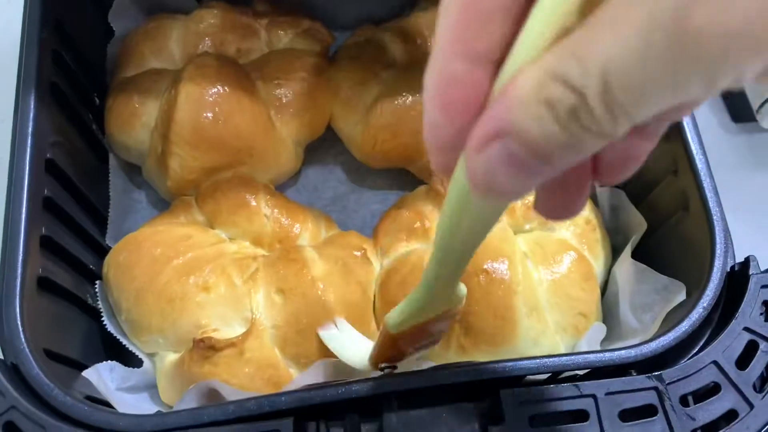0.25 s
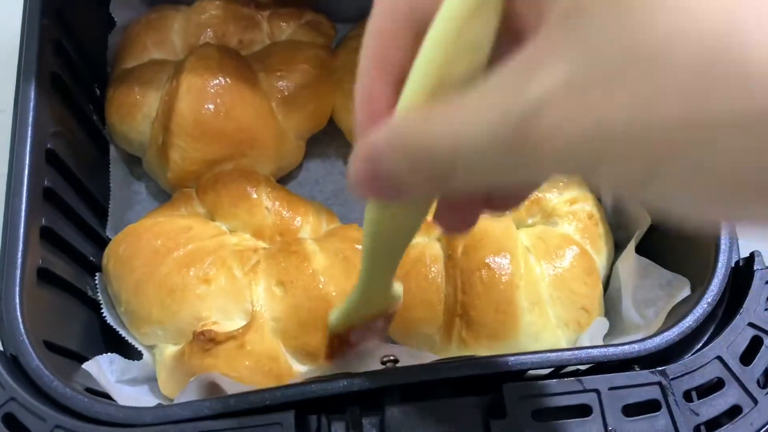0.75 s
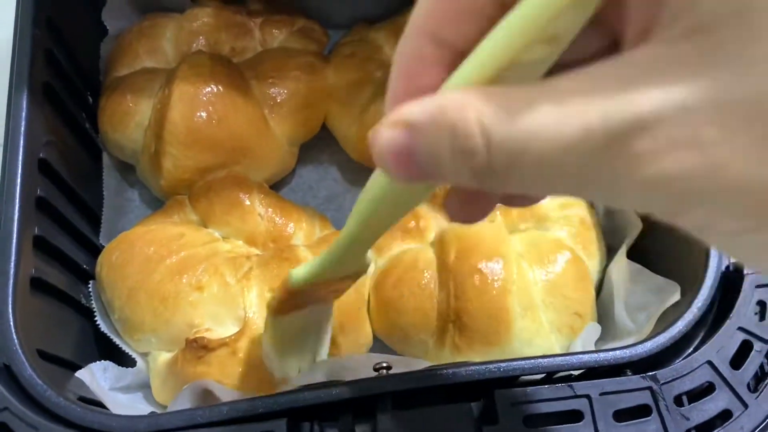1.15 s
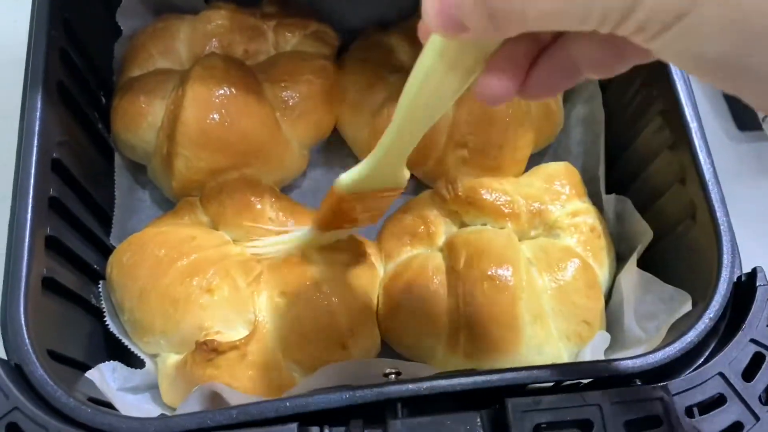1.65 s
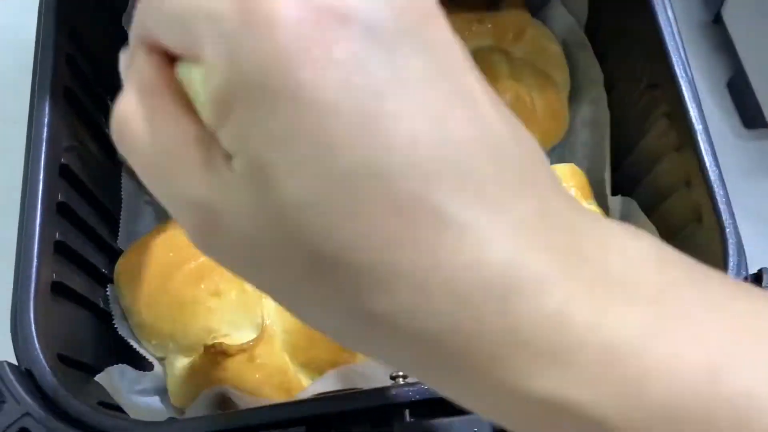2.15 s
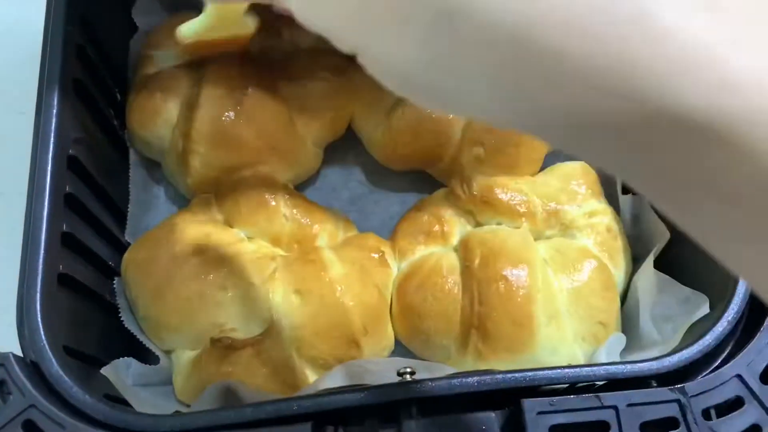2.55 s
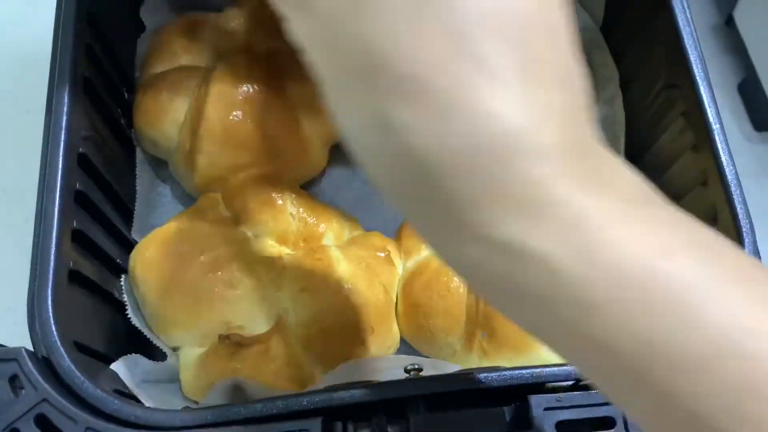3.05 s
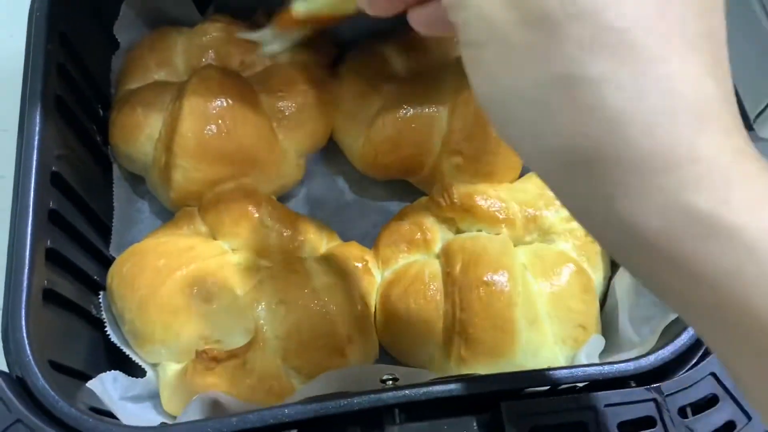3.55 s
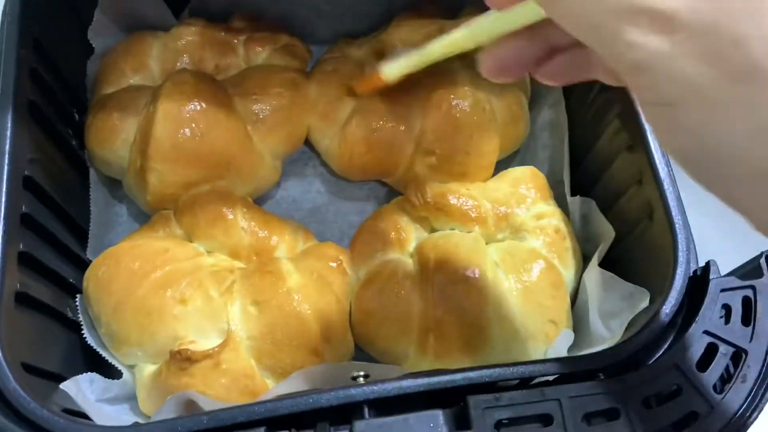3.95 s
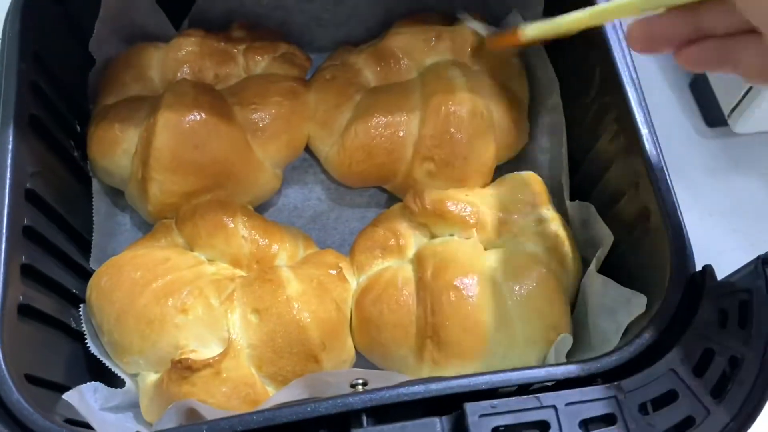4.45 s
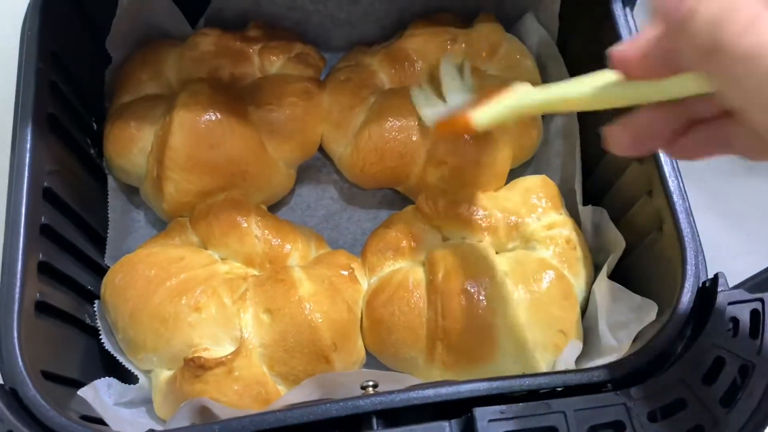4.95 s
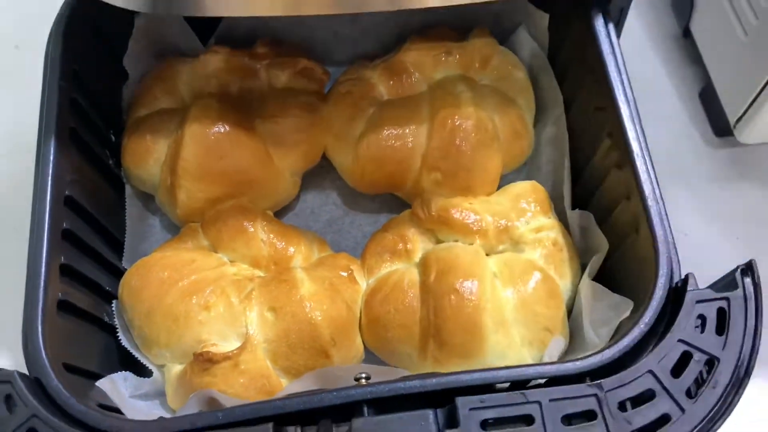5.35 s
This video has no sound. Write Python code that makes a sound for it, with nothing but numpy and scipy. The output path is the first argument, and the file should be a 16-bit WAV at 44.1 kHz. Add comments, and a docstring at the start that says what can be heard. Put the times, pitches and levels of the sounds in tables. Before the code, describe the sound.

A silicone brush swishes softly over bread rolls with tiny wet ticks, while parchment paper crackles beneath it, most busily in the first second or so. Dull thumps and rubs come from a hand on the close microphone. In the second half the brush handle knocks lightly on the air-fryer basket several times. An appliance hums steadily in a small kitchen.

```python
"""Glazing rolls in an air-fryer basket

A silicone brush swishes over bread rolls, its bristles sticking and letting go with tiny wet ticks.
Parchment buckles and crackles under it, and the handle knocks the basket and sets it ringing.
Close above, a hand slips on the phone that holds the two microphones: dull thumps, rubs and creaks.
Behind it all, a kitchen appliance hums in a small, lively room."""
import sys
import numpy as np
from scipy import signal
from scipy.fft import rfft, irfft
from scipy.io import wavfile

SR = 44100
rng = np.random.default_rng(int(sys.argv[2]) if len(sys.argv) > 2 else 0)


def materialize(psi):
    """Save the field psi as 16-bit PCM at rate SR to the path in sys.argv[1].

    A 1-D psi becomes a single channel; in a 2-D psi each row is a channel.
    """
    bounded = np.clip(np.atleast_2d(psi).T, -1, 1)
    quanta = np.round(bounded * 32767).astype(np.int16)
    wavfile.write(sys.argv[1], SR, quanta)


N = 246519

# brush strokes over crust and paper: middle_s, length_s, level_db
STROKE_SWELLS = [(0.245, 0.041, -63), (0.324, 0.027, -49), (0.467, 0.071, -68), (0.545, 0.13, -53),
                 (0.738, 0.091, -44), (0.873, 0.068, -43.5), (1.031, 0.1, -51), (1.161, 0.046, -43),
                 (1.467, 0.051, -63), (1.875, 0.16, -65), (2.021, 0.049, -54), (2.078, .05, -61),
                 (2.188, 0.12, -62.5), (2.35, 0.057, -60.5), (2.63, 0.16, -56), (2.908, 0.27, -55.5),
                 (2.993, 0.042, -44), (3.222, 0.029, -61), (3.49, 0.59, -65), (3.668, 0.02, -59),
                 (3.791, 0.049, -54.5), (3.912, 0.085, -60), (4.025, 0.089, -71), (4.23, 0.072, -56),
                 (4.683, 0.045, -60.5), (4.81, 0.038, -59), (4.874, 0.014, -52.5)]
# bright swish of the bristles: freq_hz, gain_db
BRISTLE_EQ = [(1200, -34), (2400, 6), (3500, 5), (5000, 5), (7500, 3.5), (11000, 0.5), (15000, 2)]
# the brush scraping the basket wall and rim: middle_s, length_s, level_db, rasp_hz, rasp_boost_db
BASKET_SCRAPES = [(1.148, 0.026, -44, 4930, 12), (1.294, 0.013, -40.5, 5100, 18),
                  (2.638, 0.047, -51, 2700, 5), (2.845, 0.027, -45, 3100, 10),
                  (2.896, 0.034, -43.5, 2940, 14), (2.999, 0.015, -38, 3140, 9),
                  (5.086, 0.016, -28, 8900, 9)]
# tone of a scrape under its rasp: freq_hz, gain_db
SCRAPE_EQ = [(300, -29), (900, -16), (1600, -5.5), (2400, 3.5), (5000, 7.5), (7000, -3), (9000, 3),
             (13000, -12), (15800, -22)]
# single threads of glaze parting: start_s, relative_level_db
GLAZE_THREADS = [(1.476, -51), (1.845, -45), (1.9, -40), (1.94, -54), (2.02, -50), (2.066, -43),
                 (2.09, -51), (2.17, -52), (2.361, -44), (2.766, -38), (3.228, -53), (3.545, -39),
                 (3.797, -53), (4.03, -51), (4.875, -51)]
# fader for the bed of sticky ticks: time_s, level_db
TACK_FADER = [(0, -78), (.25, -61), (1.35, -67), (1.7, -76), (2.05, -69), (2.5, -71), (3.2, -67.5),
              (3.6, -77), (3.9, -65.5), (4.3, -63), (4.9, -74), (5.25, -78)]
# parchment buckling: snap_s, relative_level_db, brightness, length_s, rustle_db, fold_hz, fold_boost_db
BUCKLES = [(0.198, -37.5, 7, 0.0017, -24, 3000, 11), (0.323, -38.5, 7, .0031, -19, 12000, 5),
           (0.3383, -27.5, 9, 0.0043, -25, 3000, 11.5), (0.343, -33, 8, 0.0027, -24, 7000, -6),
           (0.5243, -26, -5.5, 0.0035, -9, 4750, 6), (0.534, -34, 5.5, 0.018, -6, 1900, -8),
           (0.5606, -30, 12, 0.0048, -17, 13000, -4), (0.5864, -18.5, 15, .0009, -34, 14500, 1),
           (0.5948, -34, 7, .0014, -22, 12000, -1), (0.6024, -24.5, 6.5, 0.0015, -26, 13500, 5),
           (0.6052, -24, 9.5, 0.0014, -34, 12000, 0), (0.695, -23, 9.5, 0.008, -12, 2780, 9),
           (0.7038, -12, 11.5, 0.0015, -40, 2330, 8), (0.7064, -20.5, 15, 0.0022, -29, 12000, -4),
           (0.7315, -30, 7.5, 0.0045, -14, 2100, 1), (0.759, -29, 7.5, 0.0016, -21, 2400, 0),
           (0.851, -25, -5.5, 0.0023, -16, 1700, 0.5), (0.8529, -20.5, 6, 0.0037, -11, 7200, -2),
           (0.8568, -24.5, 9, 0.0026, -21, 1400, -3), (0.9189, -27.5, 10.5, .002, -17, 13500, 2),
           (0.9222, -32, 11, 0.004, -20, 2600, 6), (1.01, -30, 5.5, 0.0073, -7, 3670, 5),
           (1.053, -35, 8, 0.0011, -22, 7000, 1), (1.064, -39, 7, 0.0051, -20, 3600, 6),
           (1.202, -31, 7.5, .0016, -2, 4800, 3), (1.292, -36, -4, 0.0016, -11, 4800, 2),
           (1.2935, -31.5, 9, 0.0016, 0, 4800, 6), (1.332, -24, 12.5, 0.00084, -18, 4600, 10.5),
           (2.293, -47, 0, 0.0083, -22, 3500, 5), (2.624, -35.5, 0, .0017, -24, 2700, 13),
           (2.84, -38, 12, 0.0016, -18, 3000, 13), (2.8473, -24.5, 12, .001, -32, 3200, 11),
           (2.888, -37.5, 2, .0014, -22, 3000, 10), (2.8974, -27, 5, 0.00083, -30, 15000, 10),
           (2.923, -38, 0, .0008, -24, 15000, 6), (2.974, -33, 8, .0015, -22, 3000, 4),
           (2.979, -29, 4, .0014, -20, 2920, 12), (2.9855, -26, -2.5, 0.0012, -22, 2400, 8),
           (3.746, -39.5, 2, 0.0064, -24, 2870, 8), (4.292, -42.5, -7, 0.0075, -19, 3900, 6)]
# crisp tone of parchment: freq_hz, gain_db
PAPER_EQ = [(250, -9), (500, -3), (1050, -1.5), (1550, -7), (2400, 4), (2900, -2), (3700, -1), (5000, -1.5),
            (7000, -1), (9000, -4), (13000, -7), (15400, -6.5), (15900, -11)]
# hollow tone of the tray under the paper: freq_hz, gain_db
TRAY_EQ = [(150, -23), (330, 2.5), (500, 4.5), (750, -13), (1200, -10), (2000, -27)]
# handle hitting the basket: start_s, level_db, treble_db, body_db, crack_decay_s, relative_ring_db,
# right_lag_ms, spot_hz, spot_db, spot_t60_s, overtone_hz, overtone_db, rebound_db
HANDLE_KNOCKS = [(0.1624, -22.5, 8.5, -8, 0.0046, -27.5, 0.065, 734, -13, 0.14, 7400, -28.5, -28),
                 (3.507, -30, -5, -4, 0.0039, -11.5, 0.063, 1102, 5.5, 0.023, 2680, -6, -42),
                 (3.968, -28.5, -4.5, -2.5, 0.004, -16.5, .005, 1154, -6, 0.07, 1520, -9, -10.5),
                 (4.125, -35.5, -16, -0.5, 0.0055, -21, .005, 1570, -4, 0.029, 2070, -2.5, -23),
                 (4.2064, -33, -4, 2.5, 0.0043, -21, .02, 413, 7, 0.029, 1060, -7, -12),
                 (4.3896, -20, 13, -3, 0.0099, -6, 0.022, 450, -21, 0.045, 2898, -8, -7.5),
                 (4.4883, -43, -11, 8, 0.0086, -12, .02, 358, 11, 0.042, 880, 2, -3.5),
                 (5.0867, -22, 2, -6.5, 0.0086, -15.5, .02, 930, -6, 0.088, 2472, -8, -22)]
# dry crack of a knock: freq_hz, gain_db
CRACK_EQ = [(200, -24), (450, 19), (1000, 9), (1650, 8.5), (2300, 9.5), (3000, 2.5), (3900, 1.5), (4900, 4),
            (6100, -3), (7400, 3.5), (10000, -3.5), (15800, -6)]
# basket resonances: pitch_hz, damping, relative_level_db
BASKET_MODES = [(245, 30, 0.5), (447.4, 27, 12.5), (522, 54, 5.5), (634, 40, 2.5), (702, 40, 4),
                (888, 35, 8), (1345, 30, 8), (1505, 27, 6), (1800, 25, 5), (1918, 50, 7), (2230, 30, 9.5),
                (2293, 25, 10), (2530, 54, 1), (2767, 60, 4), (2844, 29, 10), (3330, 40, 9), (4780, 30, 1),
                (5240, 47, -4), (7040, 32, 13), (7800, 60, 5)]
# skin slipping on the phone's case: start_s, length_s, level_db, nominal_pitch_hz
SKIN_SLIPS = [(0.049, 0.0092, -33, 121), (0.126, 0.062, -33, 142), (0.251, 0.0096, -33.5, 130),
              (0.328, 0.013, -34, 170), (0.413, 0.013, -32, 122), (1.16, 0.027, -26, 130),
              (1.212, 0.056, -31.5, 163), (1.297, .04, -25.5, 135), (1.666, .01, -29.5, 131),
              (2.2684, 0.0063, -13.5, 242), (2.29, 0.008, -26, 199), (2.302, 0.014, -18, 125),
              (2.318, 0.0057, -18.5, 213), (2.334, .012, -37, 167), (2.342, 0.0091, -21.5, 224),
              (2.845, 0.0087, -29, 112), (3.163, 0.006, -32.5, 313), (3.306, 0.009, -33, 345),
              (3.4197, 0.013, -22, 144), (3.447, .012, -26, 202), (3.464, 0.011, -27.5, 150),
              (3.498, 0.0097, -21, 225), (3.522, 0.028, -24, 237), (5.084, 0.0071, -31, 235)]
# the palm shifting on the case: middle_s, length_s, level_db
PALM_RUBS = [(0.32, 0.51, -44), (1.255, 0.14, -43.5), (2.308, 0.063, -31), (3.48, 0.1, -44.5)]
# dull tone of sliding skin: freq_hz, gain_db
SCUFF_EQ = [(40, -31.5), (90, 3), (200, 3.5), (450, -7), (800, -24.5), (1200, -32.5), (4000, -75)]
# the case creaking under the fingers: start_s, level_db, pitch_hz, decay_s
CASE_CREAKS = [(2.2708, -25, 620, 0.0014), (2.2912, -33, 1050, 0.0017), (2.318, -25.5, 420, .003),
               (2.34, -36, 810, 0.0022), (2.3448, -35.5, 1100, 0.0022), (2.3855, -44, 1240, .002),
               (2.406, -46, 1090, 0.0042), (3.4166, -30, 510, 0.0026)]
# tone of a creak: pitch_multiple, gain_db
CREAK_EQ = [(.25, -3), (.7, 6.5), (1, 1), (1.5, -9), (2.5, -31), (5, -32), (12, -52)]
# slapback off the basket walls: delay_s, level_db
WALL_ECHOES = [(.00085, -20.5), (.0015, -14), (.0023, -22.5)]
# stereo balance of close sounds: freq_hz, left_minus_right_db
MIC_BALANCE = [(500, -1.5), (1100, 0), (2400, 2), (5000, 1.7), (10000, -0.3), (15000, -1.5)]
# rush of the appliance's fan: freq_hz, gain_db
FAN_EQ = [(26, -49), (45, -22), (90, 2.5), (180, -10.5), (240, 4.5), (290, -2), (390, -1.5), (520, -9),
          (900, -12), (1250, -14.5), (1550, -15), (1750, -16.5), (2100, -16.5), (3200, -33.5), (10000, -42),
          (15800, -58)]
# motor tones: pitch_hz, level_db, right_phase_lag_rad
MOTOR_TONES = [(95.7, -66, 0.42), (232.8, -50, 0.65), (396, -59.5, 0.1), (856, -57.5, 2.08),
               (1056, -58, 1.14)]
# the room's high hiss: freq_hz, gain_db
HISS_EQ = [(1200, -13), (2400, 7.5), (4000, 4.5), (7500, -2.5), (11000, -11.5), (15000, -16)]
# fader for that hiss: time_s, level_db
HISS_FADER = [(0, -60), (1.6, -62.5), (3.2, -61), (4.3, -58.5), (5.59, -58)]
# how alike the room sounds at the two microphones: freq_hz, correlation
ROOM_CORRELATION = [(50, 0.076), (110, 0.96), (250, 0.96), (430, 0.84), (650, 0.41), (1100, 1),
                    (1500, -0.83), (2200, 0.18), (2700, -0.047), (4000, -0.1), (12000, 0.063)]

TIME = np.arange(N) / SR


def bristles():
    """Soft tufts stick and let go: a fluttering hiss with sticky ticks, both riding the pressure."""
    pressure = swells(STROKE_SWELLS)
    flutter_db = 1.5 * drift(35) + 3.5 * drift(330)
    hiss = unit(colour(grains(N, spread_db=1.7, lag_samples=3.8), BRISTLE_EQ)) * undb(flutter_db)
    envelope = releases(per_s=120, spread_db=10.5, decay_s=0.00083)
    ticks = unit(colour(grains(N, spread_db=6.5, lag_samples=7.1) * envelope, PAPER_EQ, tilt_db=5))
    return pressure * (hiss + undb(-7) * ticks)


def scrapes():
    """The brush catches and slips on the basket wall: quick, uneven grit with a rasp where the wall rings."""
    catches_per_s, catch_decay_s, rasp_width_oct = 190, 0.0014, 0.24
    out, hz = np.zeros((2, N)), np.geomspace(300, 17000, 60)
    t = np.arange(SR // 8) / SR - 1 / 16
    for middle_s, length_s, db, rasp_hz, boost_db in BASKET_SCRAPES:
        tone_db = at(SCRAPE_EQ, hz) + boost_db * bell(hz, rasp_hz, rasp_width_oct)
        catches = np.cumsum(catches_per_s * undb(4 * drift(200, len(t)))) / SR
        grit = 0.25 + np.exp(-(catches % 1) / catches_per_s / catch_decay_s)
        grit *= undb(2 * drift(394, len(t)))
        eq = roughen(np.transpose([hz, tone_db]), spread_db=4)
        rasp = unit(colour(grains(len(t), spread_db=6, lag_samples=4.04) * grit, eq))
        add(out, middle_s + t[0], undb(db) * np.exp(-(2 * t / length_s) ** 2) * rasp)
    return out


def glaze():
    """Single threads of glaze part, each with a tiny, clear tick."""
    decay_s, trim_db = 0.0018, -19
    out, t = np.zeros((2, N)), np.arange(SR // 50) / SR
    for start_s, db in GLAZE_THREADS:
        tick = grains(len(t), spread_db=3.1, lag_samples=5.1) * np.exp(-t / decay_s)
        add(out, start_s, unit(colour(tick, BRISTLE_EQ)) * undb(db + trim_db))
    return out


def tack():
    """The wet bristles never quite leave the crust: countless fine threads part in a faint ticking bed."""
    envelope = releases(per_s=100, spread_db=4, decay_s=0.0006, limit_sigma=2)
    ticks = grains(N, spread_db=4.2, lag_samples=2.7) * envelope
    return unit(colour(ticks, BRISTLE_EQ, tilt_db=3)) * fader(TACK_FADER)


def releases(per_s, spread_db, decay_s, limit_sigma=np.inf):
    """Glaze lets go at random moments: an envelope of uneven spikes that die fast."""
    onsets = rng.random(N) < per_s / SR
    sizes = undb(spread_db * np.clip(rng.standard_normal(N), -limit_sigma, limit_sigma))
    return signal.lfilter([1], [1, -np.exp(-1 / (decay_s * SR))], onsets * sizes)


def parchment():
    """Each buckle creaks up under the brush, snaps, rings its fold and settles with a patchy rustle."""
    lead_s, attack_s, rustle_decay_s, trim_db = 0.015, 0.0002, 0.011, -18.5
    out, t = np.zeros((2, N)), np.arange(SR // 8) / SR - lead_s
    after = np.maximum(t, 0)
    for snap_s, db, brightness, length_s, rustle_db, fold_hz, boost_db in BUCKLES:
        snap = (1 - np.exp(-after / attack_s)) * np.exp(-after / (0.6 * length_s))
        creak = (t <= 0) * undb(-26) * np.exp(-np.abs(t) / 0.004)
        rustle = (t > 0) * undb(rustle_db) * np.exp(-after / rustle_decay_s)
        patches = undb(5.5 * drift(500, len(t)) - 2)
        envelope = snap / snap.max() + patches * (creak + rustle)
        eq = roughen(PAPER_EQ, spread_db=1.8)
        eq[:, 1] += boost_db * bell(eq[:, 0], fold_hz, width_oct=0.4)
        fibres = grains(len(t), spread_db=4, lag_samples=2.8, width=0.84)
        crackle = unit(colour(fibres * envelope, eq, tilt_db=1.63 * (brightness - 0.5)))
        add(out, snap_s - lead_s, crackle * undb(db + trim_db) * np.sqrt(length_s / 0.0029))
        add(out, snap_s, tray(db - brightness / 2, length_s))
    return pan(out, 0.12)


def tray(db, buckle_s):
    """A buckle shakes the tray under the paper, which answers short and hollow."""
    decay_s, trim_db = 0.014, -15.5
    t = np.arange(SR // 8) / SR
    body = unit(colour(diffuse(len(t)), TRAY_EQ)) * np.exp(-t / decay_s)
    return body * undb(db + trim_db) * np.sqrt(buckle_s / 0.0043)


def handle():
    """The handle hits the basket and falls back once on the rim, duller and with a longer chatter."""
    rebound_s = 0.022
    out = np.zeros((2, N))
    for start_s, db, treble_db, body_db, decay_s, ring_db, lag_ms, *spot, rebound_db in HANDLE_KNOCKS:
        add(out, start_s, knock(db, treble_db, body_db, decay_s, ring_db, lag_ms, *spot))
        rebound = knock(db + rebound_db, treble_db - 23.5, body_db,
                        decay_s=0.021, ring_db=-15, lag_ms=lag_ms,
                        spot_hz=925, spot_db=-19, spot_t60_s=0.033, overtone_hz=1448, overtone_db=-0.5)
        add(out, start_s + rebound_s, rebound)
    return out


def knock(db, treble_db, body_db, decay_s, ring_db, lag_ms,
          spot_hz, spot_db, spot_t60_s, overtone_hz, overtone_db):
    """One hit in three layers: a dry crack, a ping from the struck spot and the whole basket ringing."""
    t, lag_s = np.arange(SR // 5) / SR, lag_ms / 1000
    mic_t = t - np.array([[0], [lag_s]])
    eq = roughen(CRACK_EQ, spread_db=2.3)
    eq[:, 1] += body_db / (1 + (eq[:, 0] / 1900) ** 6)  # low shelf
    noise = grains(len(t), spread_db=3.6, lag_samples=lag_s * SR, width=1.8)
    crack = unit(colour(noise, eq, treble_db)) * np.exp(-t / decay_s)
    ping = undb(spot_db) * np.sin(2 * np.pi * spot_hz * mic_t)
    ping += undb(overtone_db) * np.sin(2 * np.pi * overtone_hz * mic_t)
    ping *= die_away(t, spot_t60_s)
    hz, damping, mode_db = np.transpose(BASKET_MODES)[:, :, None]
    weights = undb(mode_db) / np.linalg.norm(undb(mode_db))
    envelopes = weights * np.exp(-t * (42 + 0.4 * damping + 0.014 * hz))
    # high modes radiate differently towards each microphone
    turns = rng.random(hz.shape) + np.minimum(hz / 16000, 0.14) * rng.standard_normal((2, *hz.shape))
    ring = np.sum(envelopes * np.sin(2 * np.pi * (hz * mic_t[:, None] + turns)), axis=1)
    return undb(db) * (pan(crack, 0.34) + pan(ping + undb(ring_db + 6) * ring, 1.7))


def grip():
    """Slipping skin catches on the case: each catch is a scuffed thump that sinks as the skin relaxes."""
    gap_s, attack_s, glide_s = 0.0225, 0.00076, 0.0032
    out, t = np.zeros((2, N)), np.arange(SR // 10) / SR
    for start_s, length_s, db, slip_hz in SKIN_SLIPS:
        for k, (late, soft, detune, side) in enumerate(rng.standard_normal((4, 4))):
            delay_s = gap_s * (k + 0.074 * late * (k > 0))
            hz = slip_hz * 2 ** (0.15 * detune)
            pitch_hz = hz * (0.88 + 0.96 * np.exp(-t / glide_s))
            # the case flexes, so the two microphones swing a little out of step
            skew = np.array([[1], [-1]]) * 0.36 * np.sign(side)
            envelope = (1 - np.exp(-t / attack_s)) * np.exp(-t * hz / 1.47)
            thump = np.sin(2 * np.pi * np.cumsum(pitch_hz) / SR + skew) * envelope
            puff = diffuse(len(t)) * np.exp(-((t - 0.014) / 0.01) ** 2)
            scuff = unit(colour(puff, np.array(SCUFF_EQ) * [(hz / 180) ** 0.5, 1]))
            gate = np.clip(2 * (length_s - delay_s) / gap_s, 0, 1)  # mutes catches past the slip's end
            gain = undb(db - 1.1 * soft) * gate
            add(out, start_s + delay_s, gain * thump)
            add(out, start_s + delay_s - 0.008, gain * undb(-15.5) * scuff)
    return pan(out, -0.4)


def palm():
    """The palm slides on the case with a soft, dull rumble."""
    return swells(PALM_RUBS) * unit(colour(diffuse(N), SCUFF_EQ))


def case_creaks():
    """The squeezed case gives way with short, rough clicks."""
    out, t = np.zeros((2, N)), np.arange(SR // 20) / SR
    for start_s, db, hz, decay_s in CASE_CREAKS:
        burst = grains(len(t), spread_db=2.3, lag_samples=3.2, width=0.39) * np.exp(-t / decay_s)
        click = unit(colour(burst, np.array(CREAK_EQ) * [hz, 1]))
        add(out, start_s, undb(db) * click * np.sqrt(decay_s / t[-1]))
    return out


def appliance():
    """A fan's steady rush under motor tones that waver slightly in pitch and level."""
    fan_db, waver_db = -46, 2
    out = unit(colour(diffuse(N), FAN_EQ)) * undb(fan_db + 0.023 * drift(0.12))
    for hz, db, lag_rad in MOTOR_TONES:
        phase = 2 * np.pi * np.cumsum(hz + 3 * drift(25.55)) / SR
        tone = np.sqrt(2) * np.sin(phase - np.array([[0], [lag_rad]]))
        out += tone * undb(db + waver_db * np.tanh(drift(15)))
    return out


def room_hiss():
    """A faint, high hiss that slowly dips and returns."""
    return unit(colour(diffuse(N), HISS_EQ)) * fader(HISS_FADER)


def basket_echoes(x):
    """Quick echoes off the basket walls make the sounds inside a little hollow."""
    out = x.copy()
    for delay_s, db in WALL_ECHOES:
        add(out, delay_s, undb(db) * x)
    return out


def kitchen(x, wet_db, treble_db, low_t60_s, high_t60_s):
    """Counter and walls answer with a short two-band tail, softer in the treble."""
    crossover_hz, attack_s = 3500, 0.00067
    t = np.arange(SR // 2) / SR
    noise = diffuse(len(t))
    low = band(noise, "low", crossover_hz) * die_away(t, low_t60_s)
    high = band(noise, "high", crossover_hz) * die_away(t, high_t60_s)
    tail = (low + undb(treble_db) * high) * (1 - np.exp(-t / attack_s))
    tail = unit(tail) / np.sqrt(len(t))
    return x + undb(wet_db) * signal.fftconvolve(x, tail, axes=1)[:, :N]


def mic_balance(x):
    """Close sounds reach the left microphone with more upper midrange."""
    half_db = at(MIC_BALANCE, np.fft.rfftfreq(N, 1 / SR)) / 2
    return irfft(rfft(x) * undb(np.array([half_db, -half_db])), N)


def grains(count, spread_db, lag_samples, width=1.0):
    """Dense, uneven clicks, later on the right; width gives each side some treble of its own."""
    clicks = rng.standard_normal((3, count)) * undb(spread_db * rng.standard_normal(count))
    delay = np.exp(-2j * np.pi * np.fft.rfftfreq(count) * lag_samples)
    late = irfft(rfft(clicks[0]) * delay, count)
    return unit(np.array([clicks[0], late]) + width * band(clicks[1:], "high", 800))


def diffuse(count):
    """Noise from all sides: near mono in the low mids, wide in the treble."""
    mid, side = rfft(rng.standard_normal((2, count)))
    alike = np.clip(at(ROOM_CORRELATION, np.fft.rfftfreq(count, 1 / SR)), -0.99, 0.99)
    mid, side = mid * np.sqrt(1 + alike), side * np.sqrt(1 - alike)
    return unit(irfft([mid + side, mid - side], count))


def colour(x, eq, tilt_db=0):
    """Minimum-phase EQ, with a treble tilt that reaches tilt_db at 13 kHz."""
    size = 4096
    hz = np.fft.rfftfreq(size, 1 / SR)
    db = at(eq, hz) + tilt_db * np.clip(hz / 13000, 0, 1)
    cepstrum = irfft(np.log(undb(db)))
    cepstrum[1:size // 2] *= 2
    cepstrum[size // 2 + 1:] = 0
    impulse = irfft(np.exp(rfft(cepstrum)))
    return signal.fftconvolve(x, impulse[None], axes=1)[:, :x.shape[1]]


def roughen(eq, spread_db):
    """Give a fold or struck spot random peaks and dips of its own."""
    hz = np.linspace(300, 17000, 90)
    return np.transpose([hz, at(eq, hz) + spread_db * rng.standard_normal(len(hz))])


def band(x, kind, hz):
    """Gentle low-pass or high-pass."""
    return signal.sosfilt(signal.butter(2, hz, kind, fs=SR, output="sos"), x)


def bell(hz, centre_hz, width_oct):
    """Shape of a resonant EQ bump."""
    return np.exp(-(np.log2(hz / centre_hz) / width_oct) ** 2)


def at(curve, hz):
    """Read a curve on a log-frequency axis."""
    freqs, values = np.transpose(curve)
    return np.interp(np.log(hz + 1), np.log(freqs), values)


def swells(contacts):
    """Pressure of contacts that lean in and ease off."""
    return sum(undb(db) * np.exp(-(2 * (TIME - middle_s) / length_s) ** 2)
               for middle_s, length_s, db in contacts)


def fader(points):
    """Gain that rides through time_s, level_db points."""
    return undb(np.interp(TIME, *np.transpose(points)))


def die_away(t, t60_s):
    """A decay that is 60 dB down at t60_s."""
    return np.exp(-np.log(1000) * t / t60_s)


def drift(per_s, count=N):
    """Smooth random wander, spread near 1."""
    knots = rng.standard_normal(4000)
    return np.interp(np.arange(count) / SR * per_s, np.arange(len(knots)), knots)


def pan(x, left_db):
    """Lean a stereo pair to the left, or to the right if negative."""
    return x * undb(np.array([[left_db], [-left_db]]) / 2)


def add(out, start_s, x):
    """Drop a sound into the mix."""
    i = max(int(start_s * SR), 0)
    out[:, i:i + x.shape[1]] += x[:, :N - i]


def undb(db):
    """Decibels to gain."""
    return 10 ** (np.asarray(db) / 20)


def unit(x):
    """Scale to rms 1."""
    return x / np.sqrt(np.mean(x ** 2))


def scene():
    """Brush, paper and basket ring in the room; handling noise comes dry through the phone's case."""
    brushing = basket_echoes(parchment() + bristles() + glaze() + tack() + scrapes())
    brushing = kitchen(brushing, wet_db=-7, treble_db=-5.5, low_t60_s=0.14, high_t60_s=0.12)
    knocking = kitchen(handle(), wet_db=-8, treble_db=-2.5, low_t60_s=0.18, high_t60_s=0.2)
    handling = grip() + palm() + case_creaks()
    return mic_balance(brushing + knocking) + handling + appliance() + room_hiss()


def record(dry):
    """The phone thins the deepest bass and cuts the top steeply."""
    low_hz, top_hz = 58, 15950
    top_cut = signal.ellip(10, 0.2, 70, top_hz, fs=SR, output="sos")
    return signal.sosfilt(top_cut, band(dry, "high", low_hz))


dry = scene()
out = record(dry)
materialize(out)
```